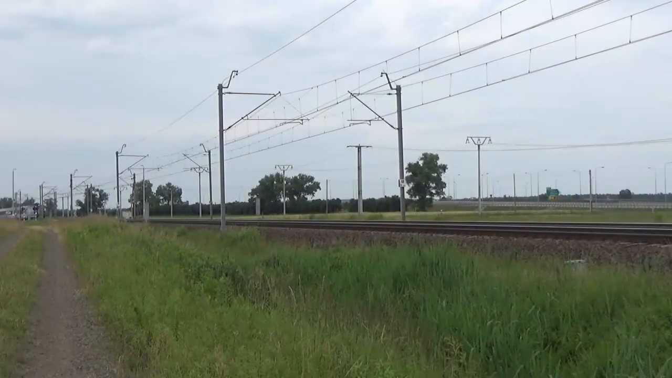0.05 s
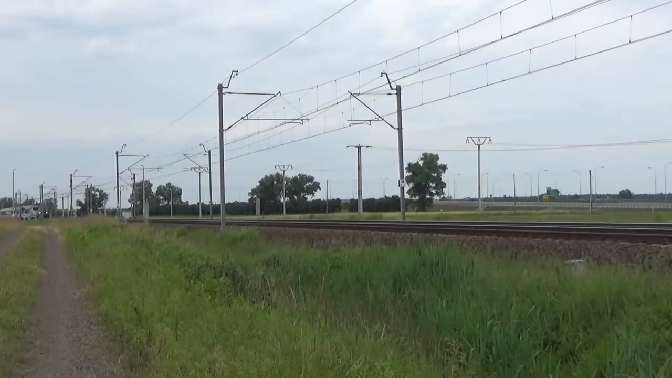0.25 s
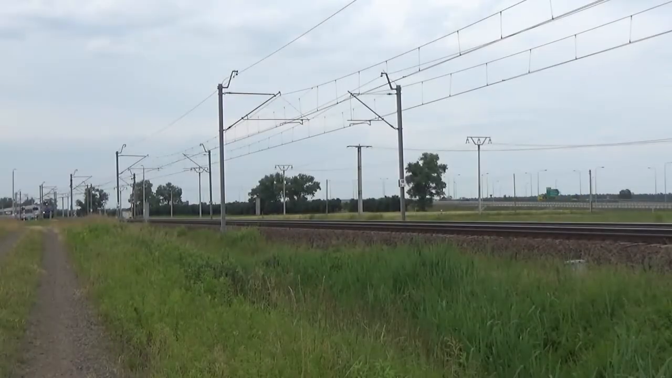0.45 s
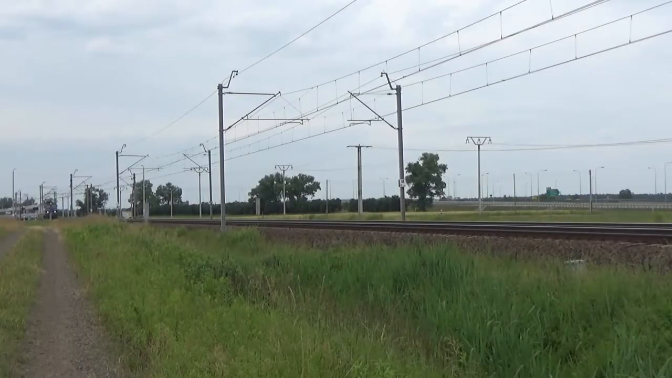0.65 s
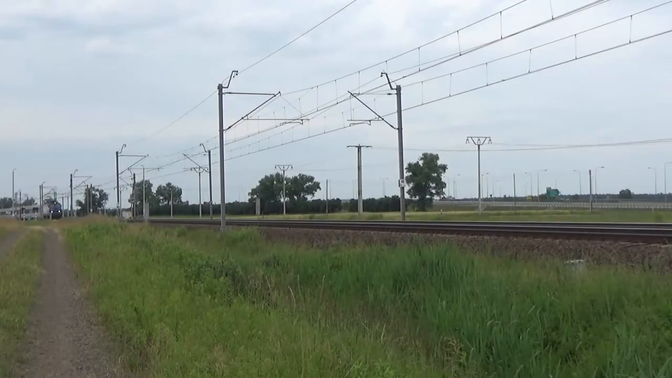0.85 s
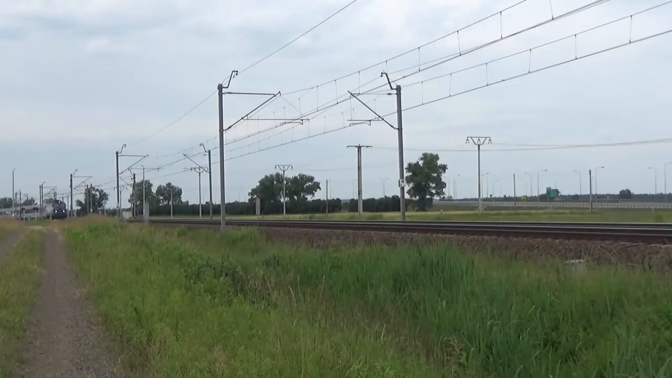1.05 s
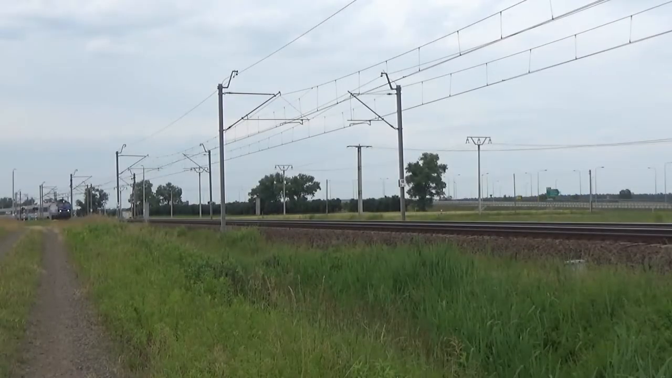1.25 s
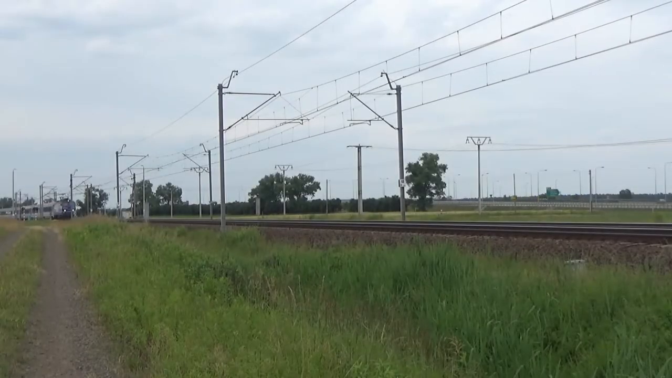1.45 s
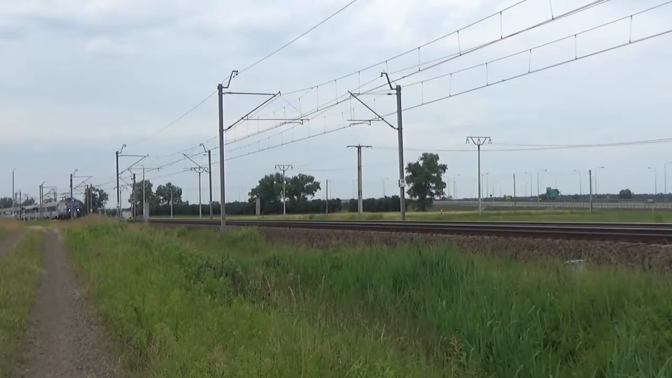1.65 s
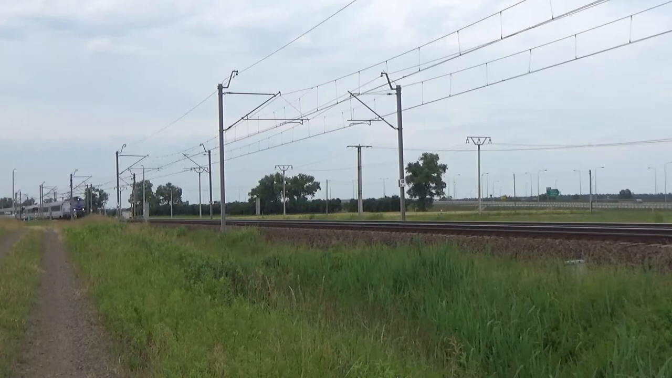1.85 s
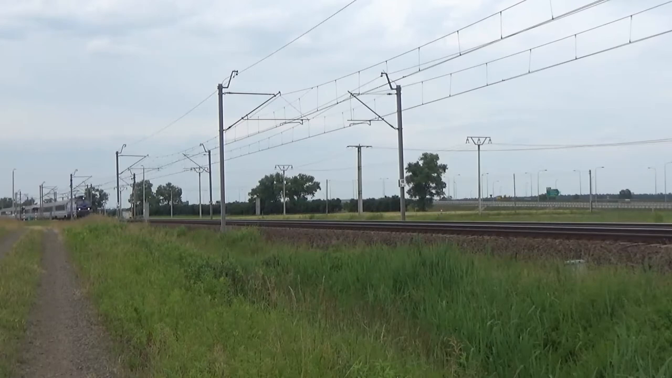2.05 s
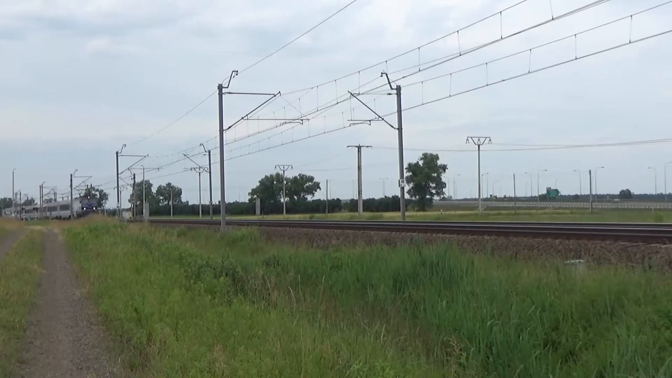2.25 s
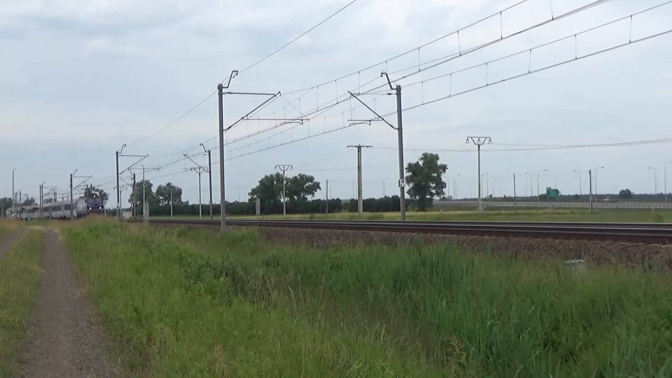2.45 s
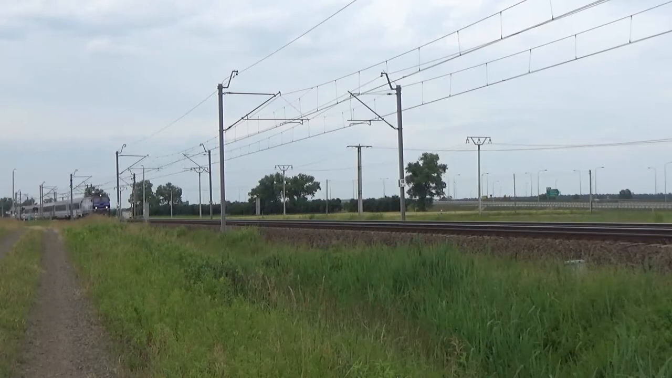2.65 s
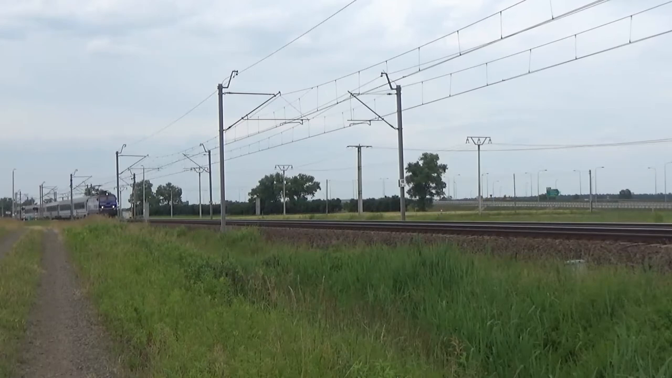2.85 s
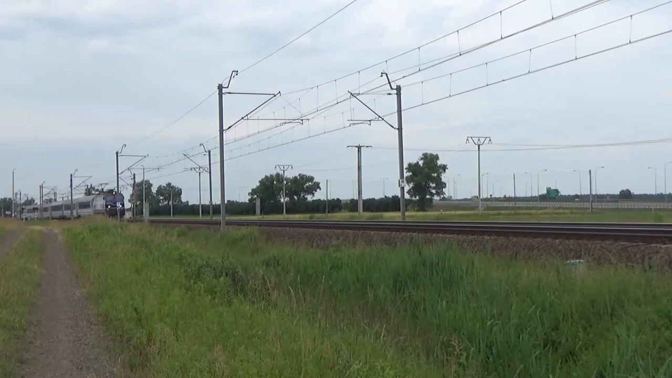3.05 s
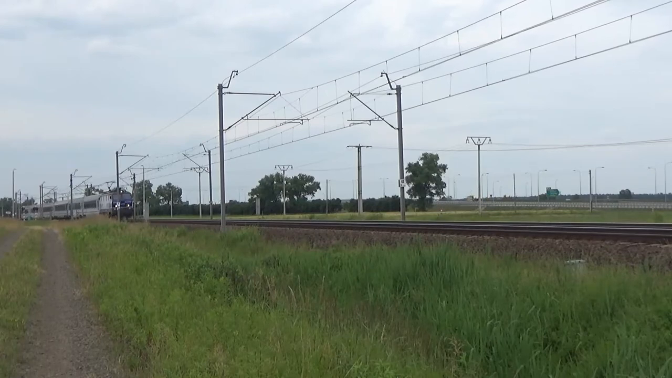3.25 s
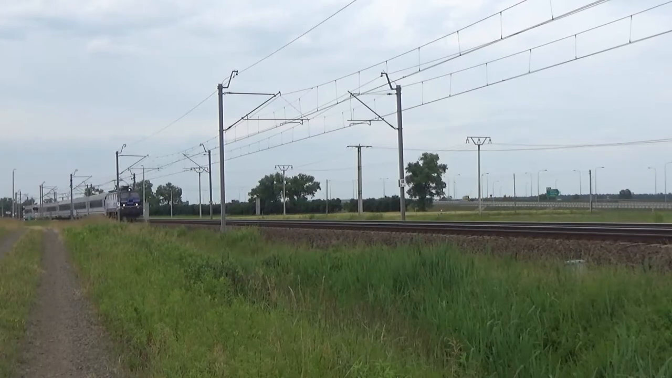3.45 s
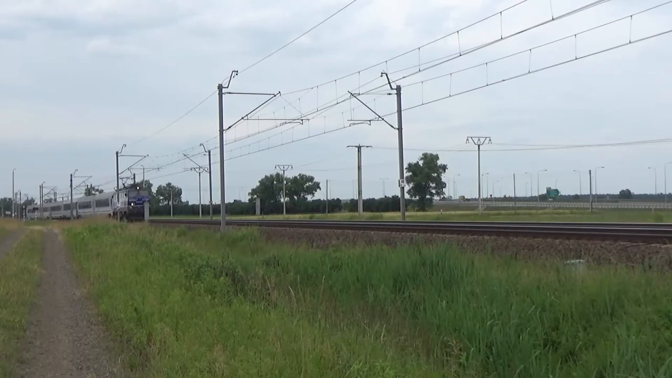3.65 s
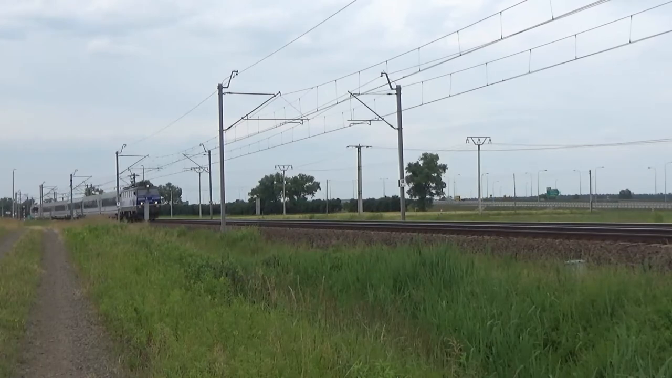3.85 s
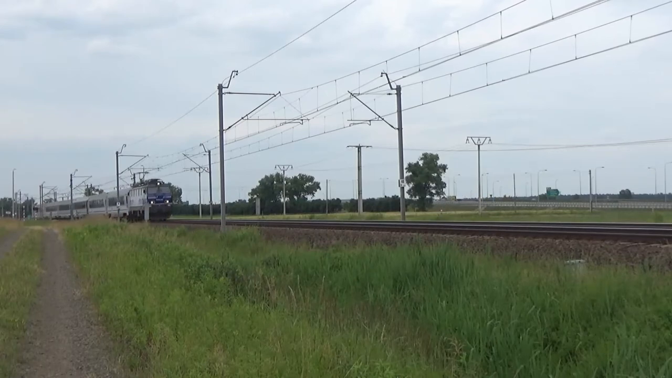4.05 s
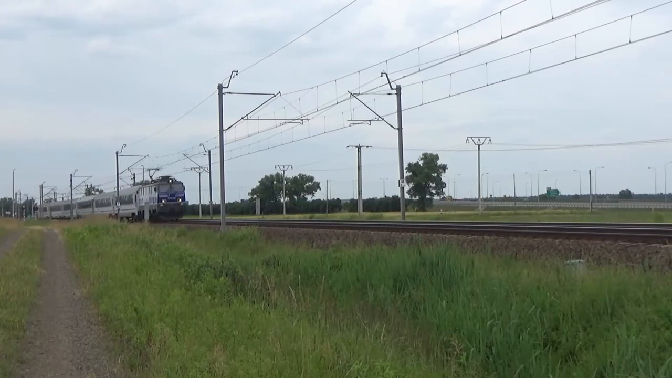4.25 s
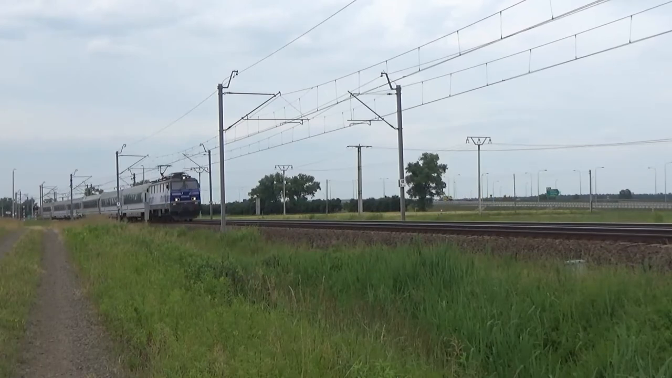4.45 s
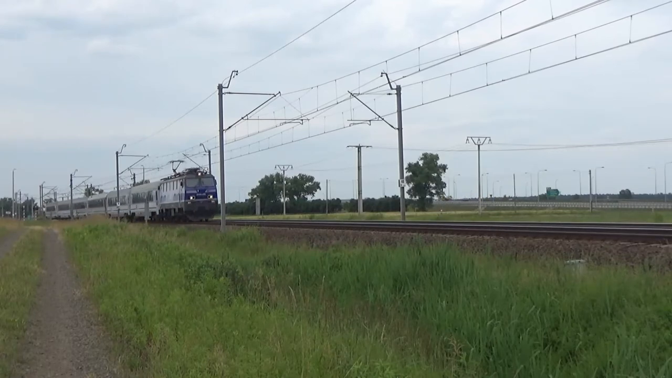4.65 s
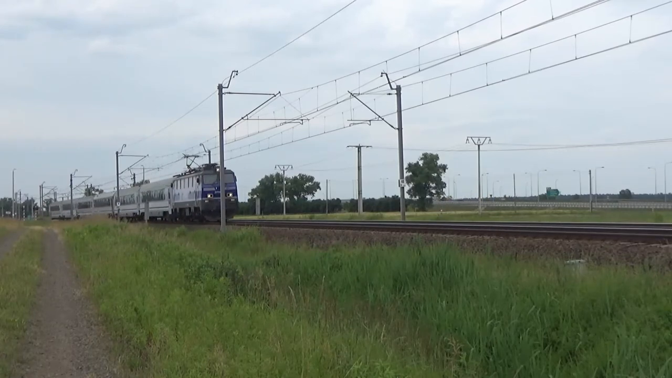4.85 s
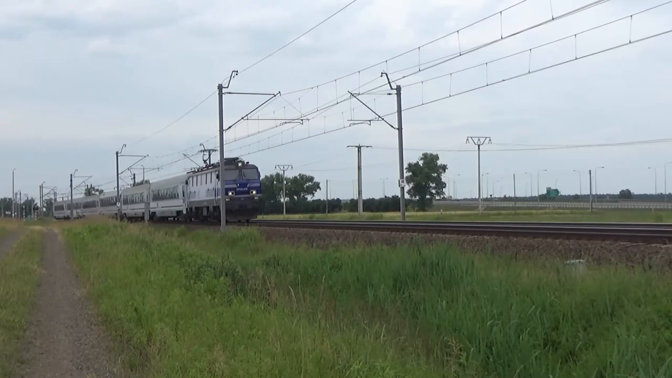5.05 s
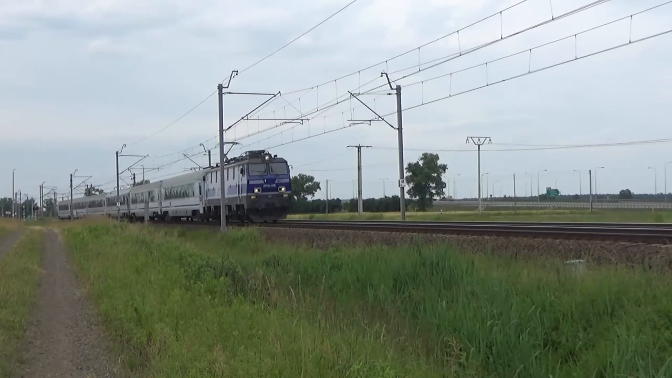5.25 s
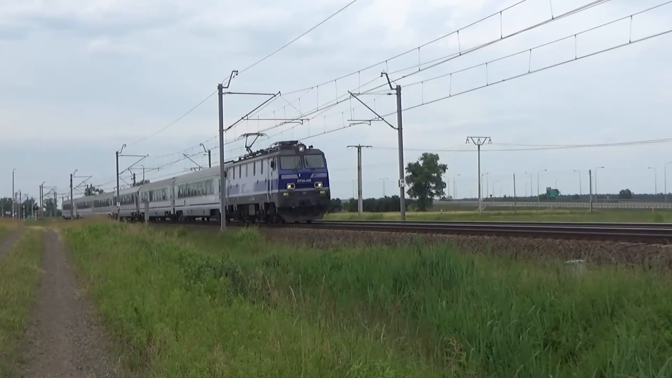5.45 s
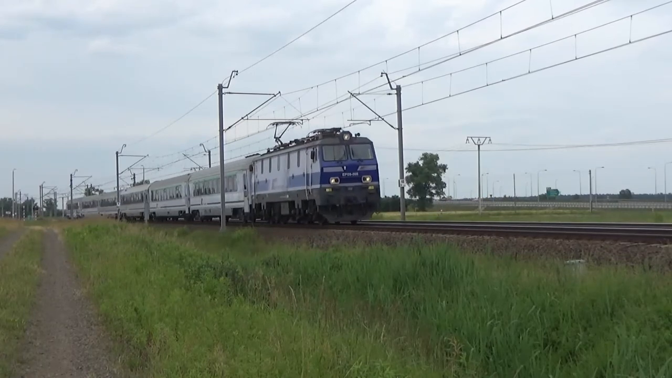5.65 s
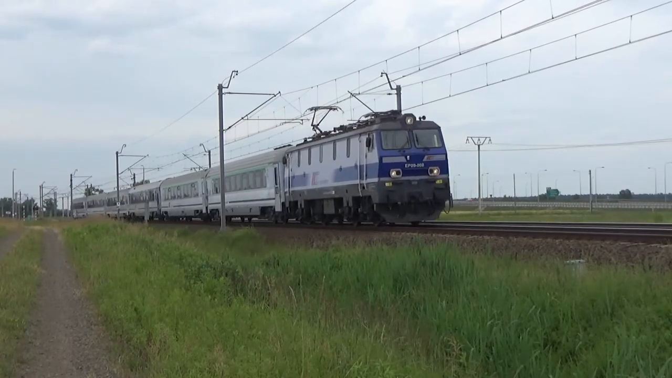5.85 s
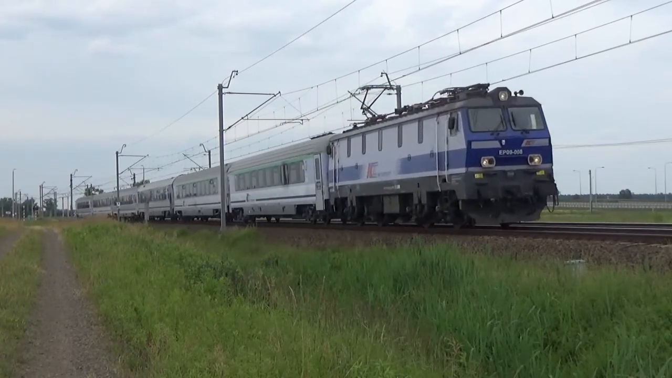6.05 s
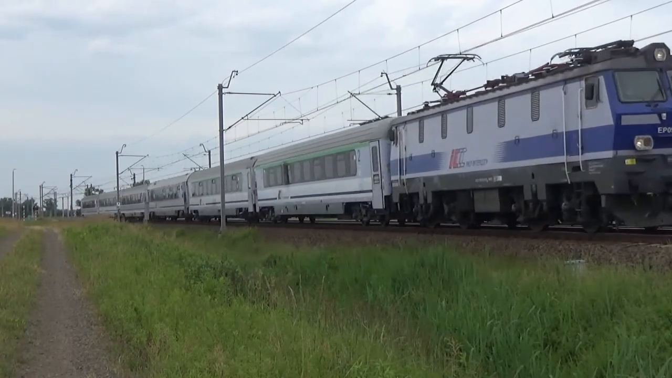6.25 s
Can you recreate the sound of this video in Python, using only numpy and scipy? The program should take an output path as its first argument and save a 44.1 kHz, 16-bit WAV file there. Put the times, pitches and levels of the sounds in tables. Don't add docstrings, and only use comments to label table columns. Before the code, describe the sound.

A fast electric train approaches across open grassland, its distant rush swelling to a loud metallic roar as rails sing and a small bird chirps.

```python
import sys
import numpy as np
from scipy import signal
from scipy.fft import rfft, irfft, next_fast_len
from scipy.io import wavfile
from scipy.ndimage import uniform_filter1d, map_coordinates

SR = 44100
rng = np.random.default_rng(int(sys.argv[2]) if len(sys.argv) > 2 else 0)


def to_wav(s):
    ch = np.atleast_2d(s).T
    pcm = np.round(np.clip(ch, -1, 1) * 32767)
    wavfile.write(sys.argv[1], SR, pcm.astype(np.int16))


def attenuation_scalar(level_db):
    decades = np.asarray(level_db, float) / 20
    return 10 ** decades


N = 278712

SPEED_M_S, PASS_S, COACH_M = 43, 6.5, 26.4


def unit(x):
    return x / np.sqrt(np.mean(np.abs(x) ** 2) + 1e-20)


def curves(rows):
    time_s, *columns = np.transpose(rows)
    return [np.interp(np.arange(N) / SR, time_s, column) for column in columns]


def wobble(rate_hz):
    knots = rng.standard_normal(int(N * rate_hz / SR) + 4)
    return map_coordinates(knots, [np.arange(N) * rate_hz / SR])


def filtered(x, response):
    m = next_fast_len(N + 8192)
    return irfft(rfft(x, m) * response(np.fft.rfftfreq(m, 1 / SR)), m)[..., :N]


def shape(points):
    f_hz, db = np.transpose(points)
    return lambda hz: attenuation_scalar(np.interp(np.log(hz + 1), np.log(f_hz + 1), db, left=-120, right=-120))


def rings(modes):
    return lambda hz: sum(attenuation_scalar(db) / (1 + (2 * (hz - centre) / width) ** 2) for centre, width, db in modes)


def stereo_noise(response, alike, patchy_db):
    cells = (257, N // 256 + 2)
    z = rng.standard_normal((2, *cells)) + 1j * rng.standard_normal((2, *cells))
    patches = uniform_filter1d(rng.standard_normal(cells), 6, 0)
    patches = unit(uniform_filter1d(patches, 14, 1))
    pair = signal.istft(z * attenuation_scalar(patchy_db * patches), window="cosine", nperseg=512)[1][:, :N]
    mid, side = filtered(pair, response)
    angle = np.arccos(np.clip(alike, 0, 1)) / 2
    mid, side = np.cos(angle) * mid, np.sin(angle) * side
    return unit(np.array([mid + side, mid - side]))


def panned(x, left_db):
    return x * attenuation_scalar(np.reshape([left_db / 2, -left_db / 2], (2, -1)))


def distance_m():
    return SPEED_M_S * (PASS_S - np.arange(N) / SR)


def heard_db(near_db, loss_db, screen_db, clear_m, over_m):
    m = distance_m()
    screened = (1 + np.tanh((m - clear_m) / (2 * over_m))) / 2
    return near_db - loss_db * m / 100 - screen_db * screened


def scraping_db():
    # (time [s], rise [dB])
    hangers = [(.87, 3), (1.13, 4), (1.55, -1), (1.98, 2), (4.37, 0), (4.58, -1), (5.069, 4), (5.27, 5),
               (5.49, 5), (5.75, 3), (5.96, 3), (6.302, -1)]
    # (time [s], rise [dB], half width [s])
    worn_wire = [
        (3.35, 2.5, .15),
        (3.8, 1.5, 0.31),
        (5.35, 3.5, 0.51),
    ]
    t = np.arange(N) / SR
    hanger_half_s = 0.048
    rows = [(s, db, hanger_half_s) for s, db in hangers] + worn_wire
    return sum(rise_db * np.exp(-((t - s) / half_s) ** 2) for s, rise_db, half_s in rows)


def train():
    # (time [s], roar [dB], left over right [dB])
    effort = [
        (0, -41, 0.5),
        (.5, -39, 1),
        (1, -36, 1),
        (2, -32, 1),
        (2.5, -29.5, 1),
        (4, -31, 0.7),
        (4.6, -28, .4),
        (5.7, -23, -1.5),
        (6.32, -22, -1.5),
    ]
    # (time [s], left over right [dB])
    air_side = [
        (0, .3),
        (2.2, 0),
        (3.5, -2.5),
        (5, -3),
        (6.32, 0),
    ]
    # (frequency [Hz], level [dB per Hz])
    rumble_spectrum = [(15, -23), (30, -18), (60, -16.5), (85, -15.5), (105, -12.5), (170, -10.5),
                       (205, -6.5), (250, -6.5), (310, 0), (370, -1), (440, -3.5), (520, 0), (680, -42)]
    buffet_spectrum = [(15, -1), (40, -1), (90, -6), (200, -25)]
    roar_spectrum = [(400, -43), (560, -12.5), (700, -13), (830, -5), (940, -9.5), (1200, -3.5),
                     (1370, -0.5), (1540, -6), (1690, -2.5), (2050, -5), (2450, -8), (2850, -8),
                     (3400, -14.5), (4600, -27)]
    drone_spectrum = [(380, -28), (480, -6), (620, 6.5), (800, 2.5), (1000, 2), (1150, 3), (1300, -23)]
    fizz_spectrum = [(2600, -15), (3300, -2.5), (3700, -0.5), (4100, 1), (4600, -0.5), (5100, -1),
                     (5700, -7), (6400, -8.5), (7500, -19)]
    air_spectrum = [(4500, -13), (5600, 0.5), (6500, -0.5), (7500, -1), (8500, -1.5), (9500, -2.5),
                    (11000, -11), (13000, -21), (15700, -28)]
    # (frequency [Hz], width [Hz], level [dB])
    wheel_modes = [(1466, 83, -1), (1663, 285, 11.5), (2360, 130, 3.5), (2960, 550, -18)]
    # (alongside [dB], loss [dB per 100 m], far screening [dB], clear at [m], over [m])
    rumble_reach = (-24, 5.5, 4, 62, 2)
    drone_reach = (-18.5, 7, 12, 103, 14.5)
    ring_reach = (-19.5, 7, 20.5, 109, 42)
    air_reach = (-29.5, 7, 26.5, 138.5, 72)

    roar_db, left_db = curves(effort)
    rumble_db = heard_db(*rumble_reach) + 0.33 * roar_db
    rumble = attenuation_scalar(rumble_db) * stereo_noise(shape(rumble_spectrum), alike=0.98, patchy_db=0.0)
    buffet = attenuation_scalar(rumble_db - 29) * stereo_noise(shape(buffet_spectrum), alike=.05, patchy_db=3.0)
    roar = attenuation_scalar(roar_db + 0.72) * stereo_noise(shape(roar_spectrum), alike=0.95, patchy_db=0.73)
    drone_db = heard_db(*drone_reach) - 4.5
    drone = attenuation_scalar(drone_db) * stereo_noise(shape(drone_spectrum), alike=0.92, patchy_db=-0.8)
    ring = attenuation_scalar(heard_db(*ring_reach)) * stereo_noise(rings(wheel_modes), alike=0.74, patchy_db=-0.8)
    gusts_db = .3 * wobble(16) + .8 * wobble(40)
    fizz_db = roar_db - 4 - 4 * distance_m() / 100 + gusts_db
    fizz = attenuation_scalar(fizz_db) * stereo_noise(shape(fizz_spectrum), alike=.95, patchy_db=-0.07)
    air_db = heard_db(*air_reach) + 6.0 + 0.36 * scraping_db() + gusts_db
    air = attenuation_scalar(air_db) * stereo_noise(shape(air_spectrum), alike=0.87, patchy_db=1.0)
    wheels = rumble + buffet + panned(roar + ring + fizz, left_db) + panned(drone, 0.26)
    return wheels + panned(air, curves(air_side)[0])


def fields():
    # (frequency [Hz], level [dB per Hz])
    hum_spectrum = [(15, -18), (50, -15), (80, 1.5), (110, -18), (200, -1), (320, -30)]
    return attenuation_scalar(-71.5) * stereo_noise(shape(hum_spectrum), alike=1.0, patchy_db=1.5)


def collector():
    # (time [s], frequency [Hz])
    whine_pitch = [
        (0, 9545),
        (4.7, 9525),
        (5.1, 9420),
        (6.32, 9380),
    ]
    # (frequency [Hz], level [dB per Hz])
    hiss_spectrum = [(10300, -22), (11100, -2), (12200, -3), (12900, 0), (13500, -2), (13900, -6),
                     (14400, -2), (14900, -6), (15700, -12)]
    sizzle_spectrum = [(9600, -30), (9950, -10), (10300, -9), (10750, -8.5), (11200, -25)]
    # (alongside [dB], loss [dB per 100 m], far screening [dB], clear at [m], over [m])
    hiss_reach = (-43.5, 3, 20, 191, 32)
    sizzle_reach = (-44.5, 3, 20, 198, 27)
    whine_reach = (-52, 6.5, 8, 195, 2)

    burst_db = scraping_db()
    flutter_db = .6 * wobble(90) + 1.3 * wobble(260)
    hiss_db = heard_db(*hiss_reach) + burst_db + flutter_db
    hiss = attenuation_scalar(hiss_db) * stereo_noise(shape(hiss_spectrum), alike=0.93, patchy_db=1.5)
    sizzle_db = heard_db(*sizzle_reach) - 1.0 + .4 * burst_db + 0.47 * flutter_db
    sizzle = attenuation_scalar(sizzle_db) * stereo_noise(shape(sizzle_spectrum), alike=0.93, patchy_db=0.5)
    shaken = unit(1.3 + wobble(90) + 1j * wobble(90))
    whine_hz, = curves(whine_pitch)
    carrier = np.exp(2j * np.pi * np.cumsum(whine_hz) / SR)
    whine = attenuation_scalar(heard_db(*whine_reach) + 5.5) * np.real(shaken * carrier)
    return hiss + panned(sizzle, 1.6) + panned(whine, 2.5)


def gears():
    # (time [s], level [dB], half width [s])
    swells = [
        (.1, -51, .22),
        (.78, -42.5, .17),
        (1.8, -45, .17),
        (2.66, -42, .14),
        (4.3, -42.5, .22),
        (6.3, -48, .5),
    ]
    # (mesh order, level [dB])
    orders = [(2, -21), (3, -10), (4, -3), (5, -8)]
    t = np.arange(N) / SR
    mesh_hz, rest_db = 445.4, -57
    size = attenuation_scalar(rest_db) + sum(attenuation_scalar(db) * np.exp(-((t - s) / half_s) ** 4) for s, db, half_s in swells)
    phase = 2 * np.pi * mesh_hz * t
    hum = 0
    for order, db in orders:
        level = attenuation_scalar(db + 3.5 + 1.1 * wobble(4.1))
        hum = hum + level * np.sin(order * phase + 0.36 * wobble(9))
    return panned(size * hum, 5.2)


def whistles(events, length_s, fall_hz):
    out = np.zeros(N + SR)
    t = np.linspace(0, 1, int(length_s * SR))
    for s, db, hz in events:
        sweep = 2 * np.pi * np.cumsum(hz + fall_hz * (.5 - t)) / SR
        start = round((s - length_s / 2) * SR)
        out[start:][:len(t)] += attenuation_scalar(db) * np.sin(np.pi * t) ** 2 * np.sin(sweep)
    return out[:N]


def bird():
    # (time [s], peak [dB])
    tick_events = [
        (1.276, -49),
        (1.476, -42),
        (1.640, -41),
        (1.784, -37),
    ]
    # (time [s], peak [dB], frequency [Hz])
    chirp_events = [(2.545, -37, 7000), (2.57, -50, 7300), (2.605, -38, 5400), (2.63, -49, 7450),
                    (2.68, -50, 7400), (2.745, -45, 5350), (2.755, -47, 7500), (2.785, -46, 7450),
                    (2.81, -46, 7300), (2.845, -48, 5450), (2.895, -44, 5300), (2.915, -50, 7450),
                    (2.93, -49.5, 5400), (2.96, -43, 7250), (3.03, -45, 5350), (3.105, -45, 5650),
                    (3.2, -50, 7450), (3.27, -48, 5400), (3.34, -40, 5500), (3.395, -40, 5450),
                    (3.51, -49, 7550)]
    tick_hz, trill_hz = 6000, 6900
    trill_s, trill_gap_s, trill_db, fade_db = 1.901, .0504, -41.5, .3
    climb = .4

    ticks = whistles([(s, db, tick_hz) for s, db in tick_events], length_s=.0058, fall_hz=2600)
    trill_events = []
    for k in range(7):
        hz = trill_hz - (trill_hz - tick_hz) * climb ** (k + .5)
        trill_events.append((trill_s + k * trill_gap_s, trill_db - fade_db * k, hz))
    trill = whistles(trill_events, length_s=.006, fall_hz=1900)
    chirps = whistles(chirp_events, length_s=.014, fall_hz=300)
    twitter_events = []
    for a, b, c in rng.random(size=(30, 3)):
        s, hz = np.interp(a, [0, 1], (2.55, 3.02)), np.interp(c, [0, 1], (7200, 7650))
        twitter_events.append((s, -53.5 + 4 * b, hz))
    twitter = whistles(twitter_events, length_s=.014, fall_hz=-300)
    return panned(ticks + trill + chirps + twitter, -13)


def rails():
    # (frequency [Hz], level [dB per Hz])
    low_spectrum = [(520, -48), (610, -14.5), (700, -4.5), (790, -4.5), (890, 0), (960, -1.5), (1020, -7.5),
                    (1070, -5.5), (1100, -36)]
    main_spectrum = [(1040, -16), (1090, -3.5), (1170, 1.5), (1230, 0.5), (1280, -3), (1340, -5),
                     (1360, -10), (1385, -58)]
    high_spectrum = [(5800, -32), (6150, -9), (6420, -4), (6750, -3.5), (7030, 0), (7220, -7), (7400, -16),
                     (8100, -40)]
    # (frequency [Hz], width [Hz], level [dB])
    span_modes = [(1332, 45, 0), (1290, 40, -7), (1240, 40, -14)]
    t = np.arange(N) / SR
    joint_s = 1.88
    since_s = np.maximum(t - joint_s, 0)
    beat_fade_s = 1.8
    span_fades_s = (5.3, 5.8)

    def grown_db(final_db, short_db, settle_s):
        return final_db - short_db * np.exp(-since_s / settle_s)

    def beat(peak_s, count):
        cycles = count * (t - peak_s) * SPEED_M_S / COACH_M
        return np.exp(-(since_s / beat_fade_s) ** 2) * np.cos(2 * np.pi * cycles)

    def below_edge(hz):
        return rings(span_modes)(hz) / (1 + (hz / 1368) ** 100)

    bogie_s, coach_s = 2.23, 2.73
    low_db = grown_db(-20, short_db=23.2, settle_s=3.13) + 3 * beat(bogie_s, count=2)
    low = attenuation_scalar(low_db) * stereo_noise(shape(low_spectrum), alike=0.99, patchy_db=1.24)
    song_db = grown_db(-24, short_db=10.8, settle_s=1.34) + 1.5 * beat(coach_s, count=1)
    main_db = song_db + np.interp(t, span_fades_s, [-3.6, -1.2])
    main = attenuation_scalar(main_db) * stereo_noise(shape(main_spectrum), alike=0.75, patchy_db=0.9)
    span_db = song_db + np.interp(t, span_fades_s, [-2.6, -8])
    span = attenuation_scalar(span_db) * stereo_noise(below_edge, alike=1.0, patchy_db=-0.6)
    high_db = grown_db(-35.5, short_db=13, settle_s=1.53) - 2.5
    high_db = high_db + 0.84 * beat(coach_s + 0.2, count=1) + 0.52 * wobble(25)
    high = attenuation_scalar(high_db) * stereo_noise(shape(high_spectrum), alike=0.72, patchy_db=0.1)
    onset = attenuation_scalar(np.interp(t - joint_s, [-.1, 0], [-30, 0]))
    gentle_onset = attenuation_scalar(np.interp(t - joint_s, [-.26, -.06, .09], [-34, -6, 0]))
    song = panned(low, -7.0) + panned(main, -11.5) + panned(span, -4.5)
    return onset * song + gentle_onset * panned(high, -10.5)


def scene():
    return train() + fields() + collector() + gears() + bird() + rails()


def band_limit(x):
    return signal.sosfilt(signal.butter(12, 15720, fs=SR, output="sos"), x)


def record(dry):
    top_hz = 15810
    mix = filtered(dry, lambda hz: hz < top_hz)
    return band_limit(mix)


dry = scene()
out = record(dry)
to_wav(out)
```